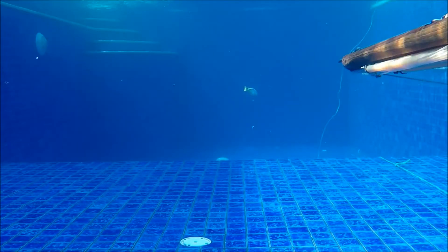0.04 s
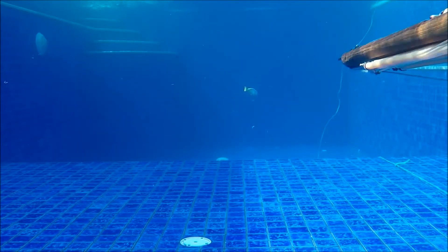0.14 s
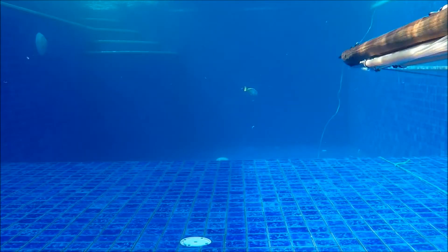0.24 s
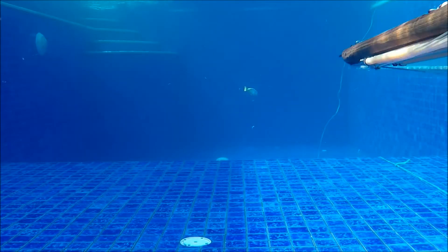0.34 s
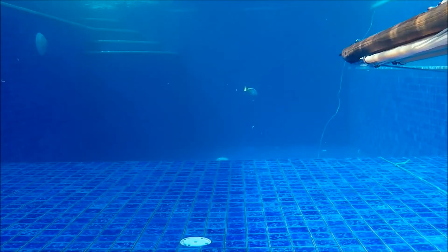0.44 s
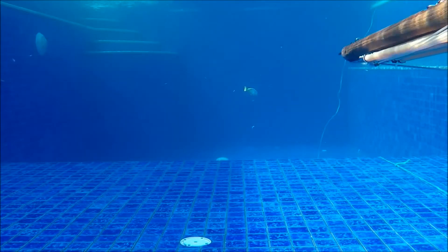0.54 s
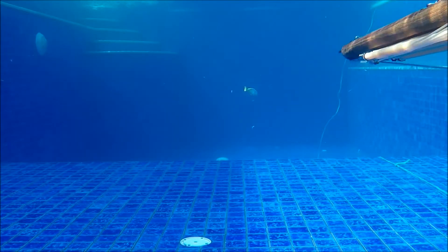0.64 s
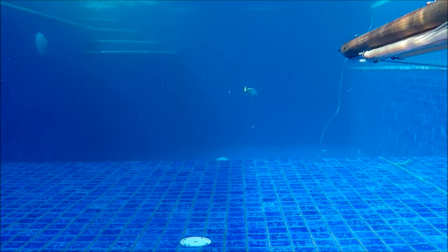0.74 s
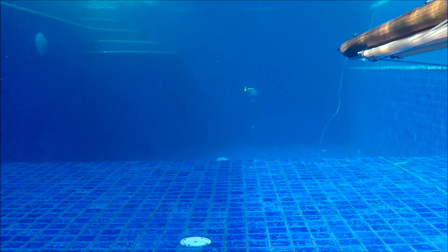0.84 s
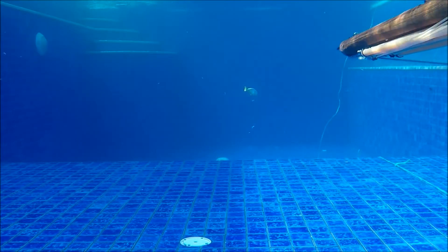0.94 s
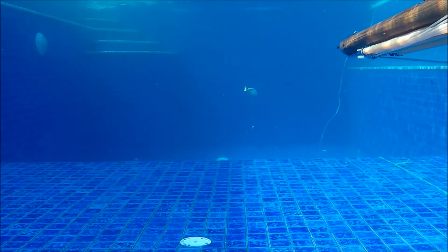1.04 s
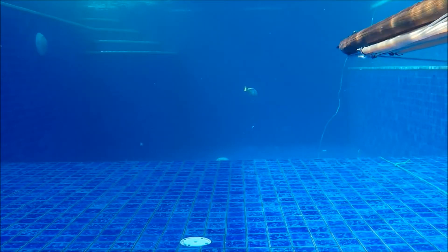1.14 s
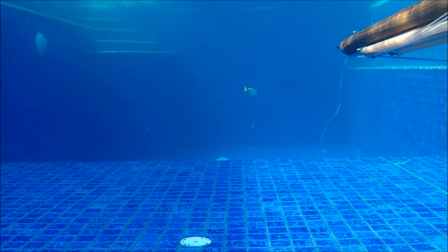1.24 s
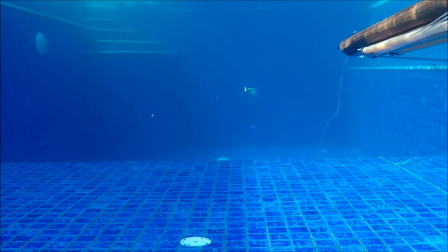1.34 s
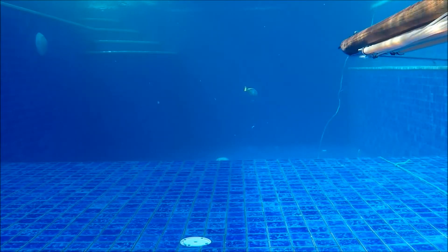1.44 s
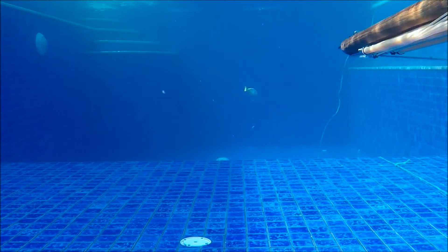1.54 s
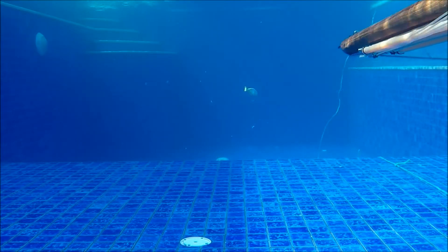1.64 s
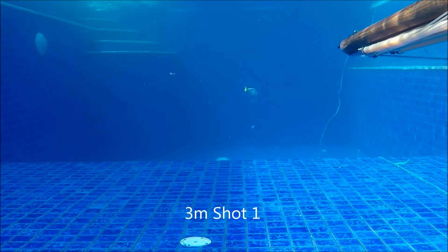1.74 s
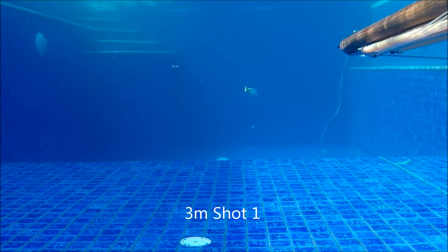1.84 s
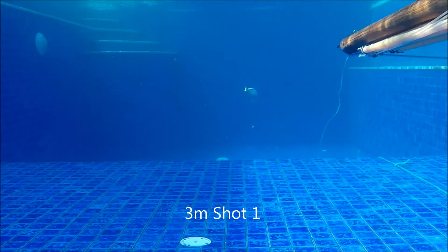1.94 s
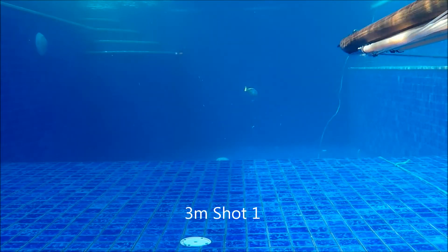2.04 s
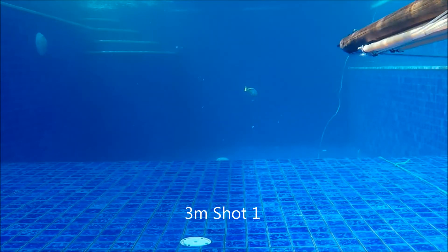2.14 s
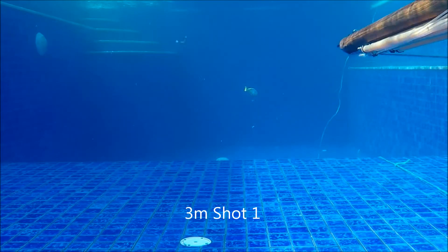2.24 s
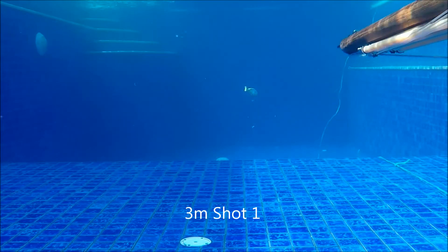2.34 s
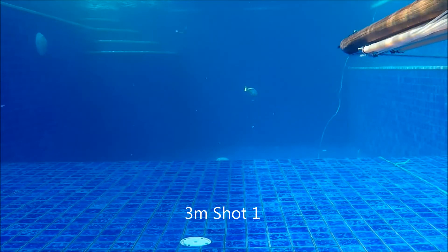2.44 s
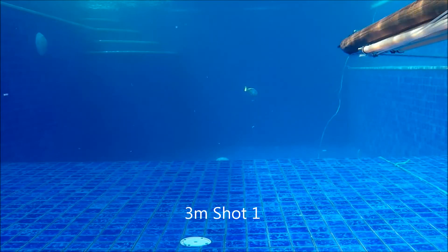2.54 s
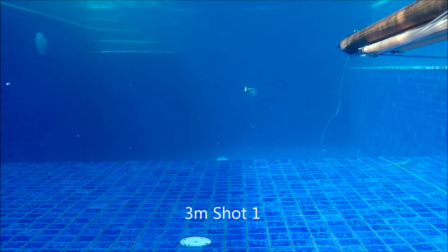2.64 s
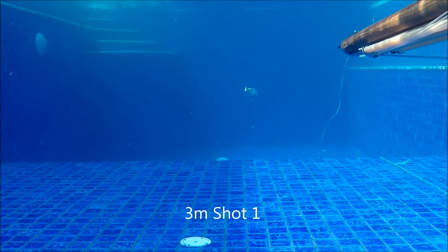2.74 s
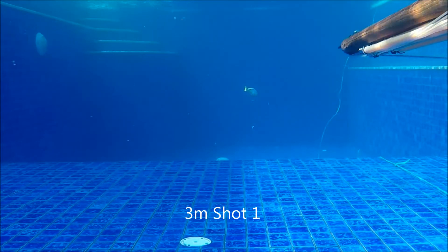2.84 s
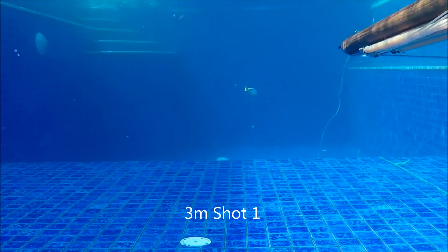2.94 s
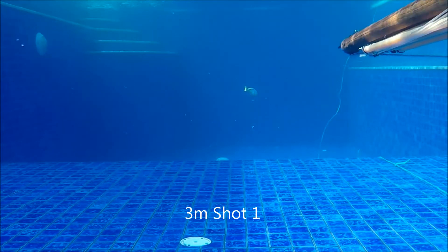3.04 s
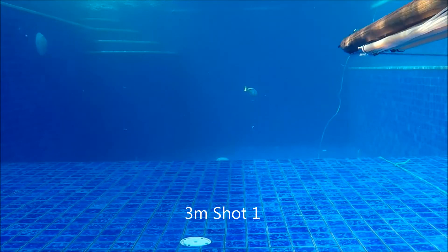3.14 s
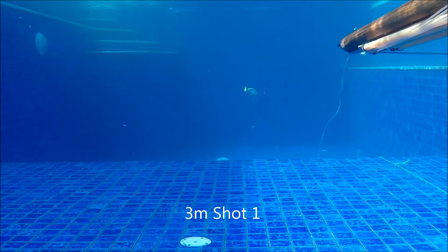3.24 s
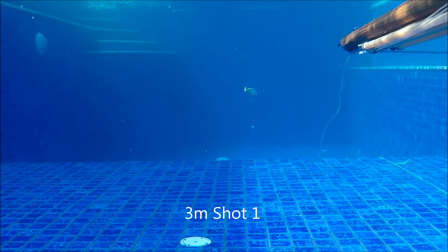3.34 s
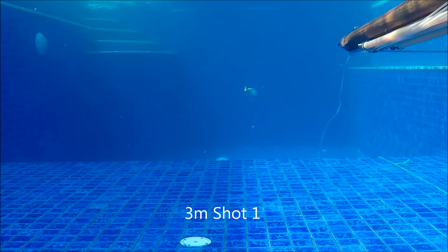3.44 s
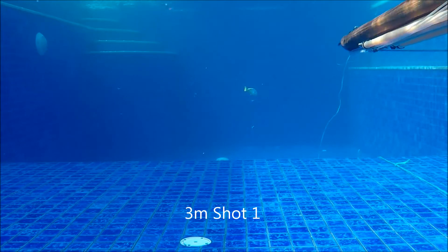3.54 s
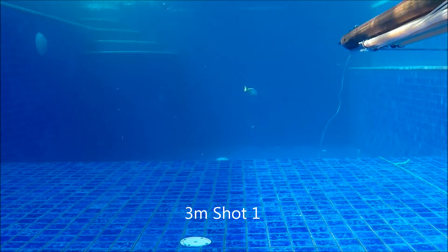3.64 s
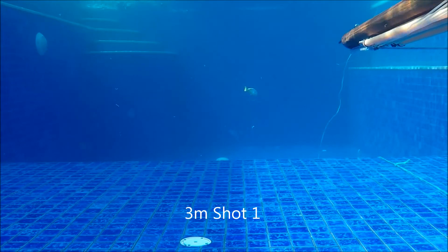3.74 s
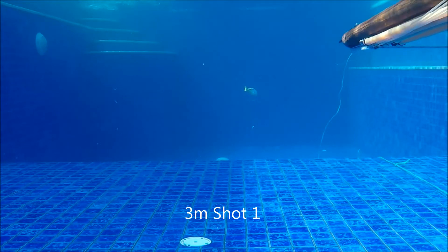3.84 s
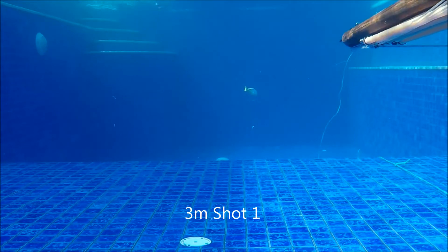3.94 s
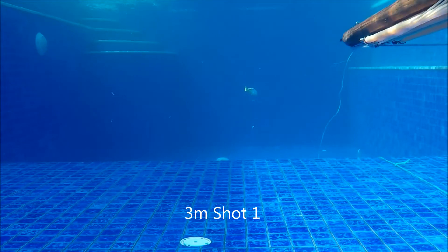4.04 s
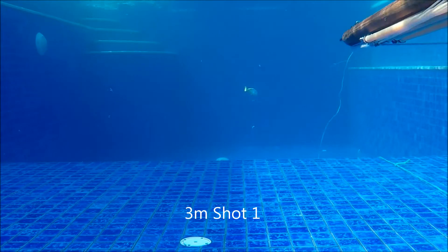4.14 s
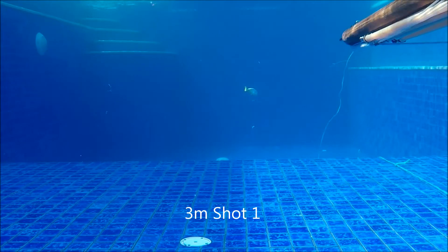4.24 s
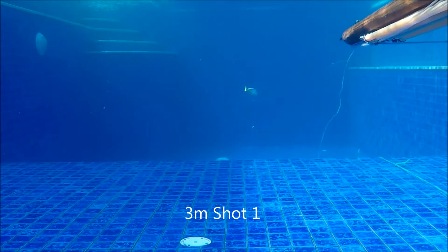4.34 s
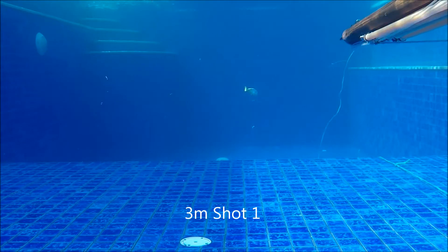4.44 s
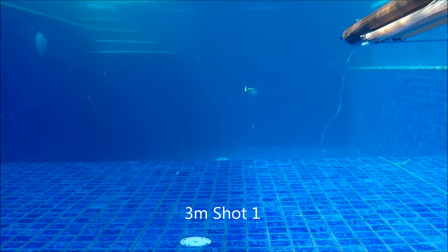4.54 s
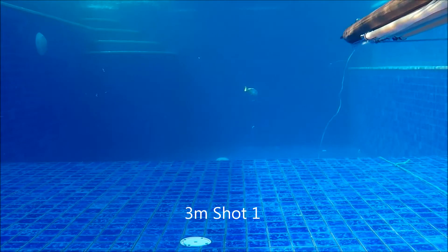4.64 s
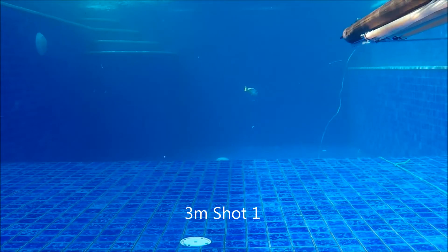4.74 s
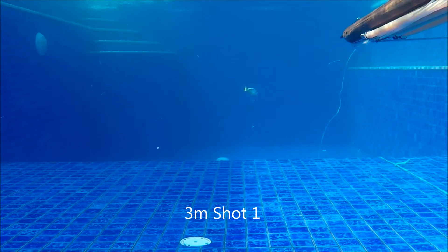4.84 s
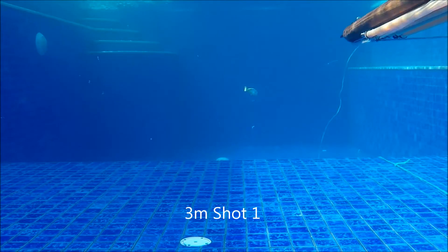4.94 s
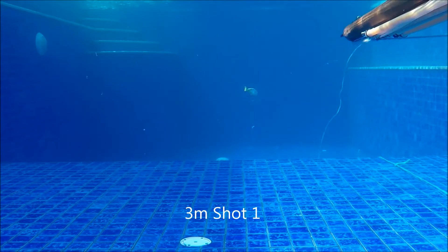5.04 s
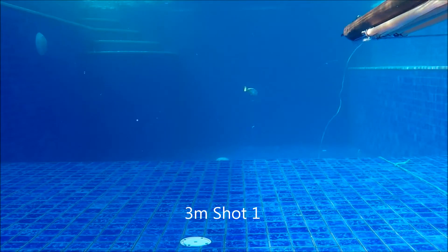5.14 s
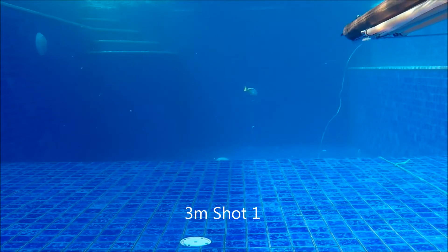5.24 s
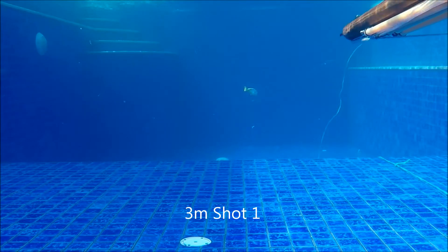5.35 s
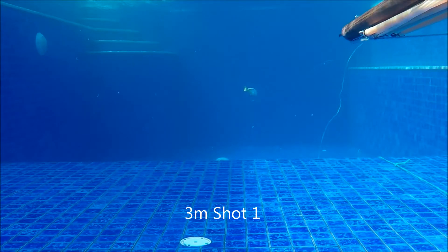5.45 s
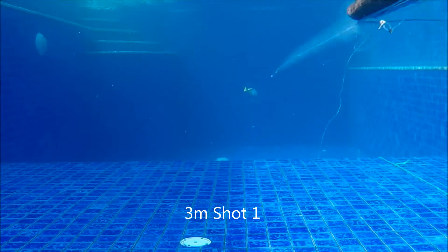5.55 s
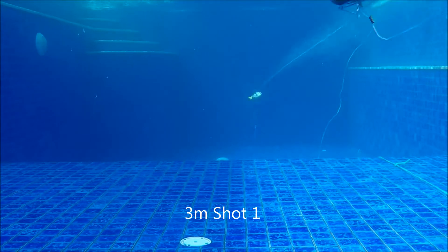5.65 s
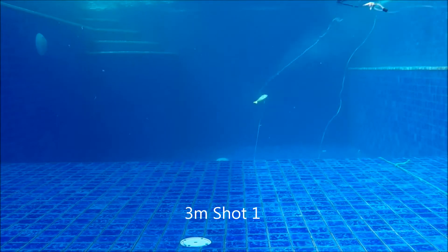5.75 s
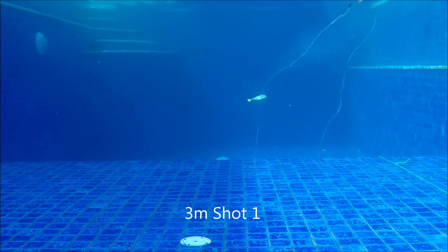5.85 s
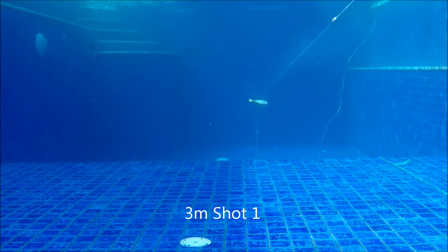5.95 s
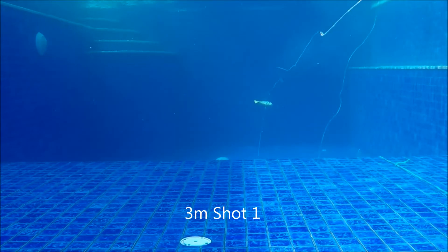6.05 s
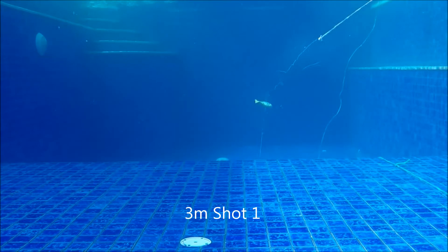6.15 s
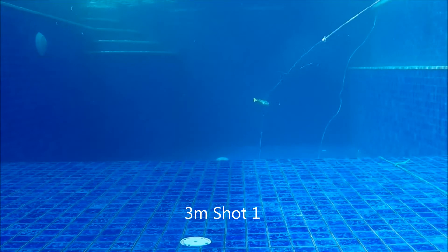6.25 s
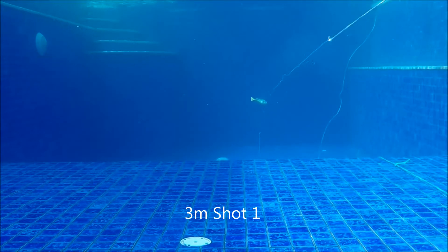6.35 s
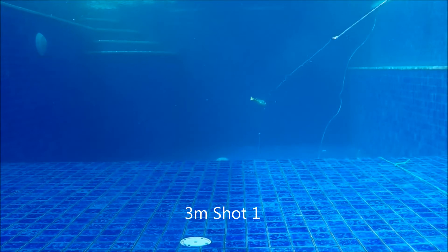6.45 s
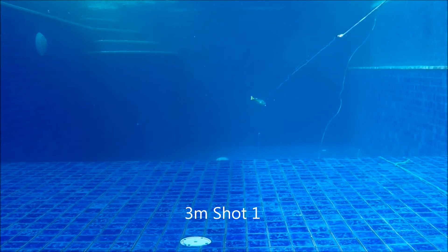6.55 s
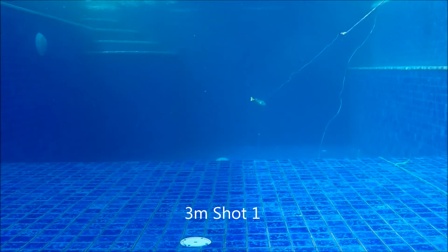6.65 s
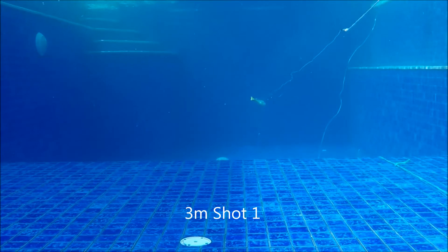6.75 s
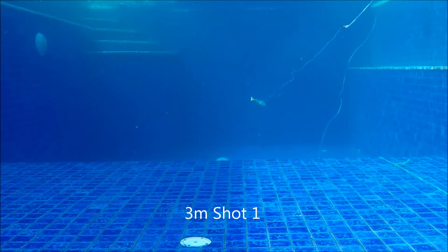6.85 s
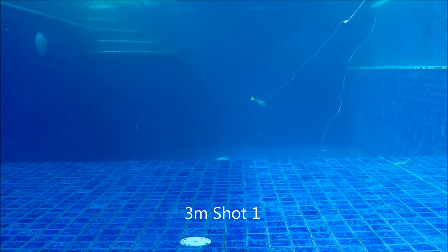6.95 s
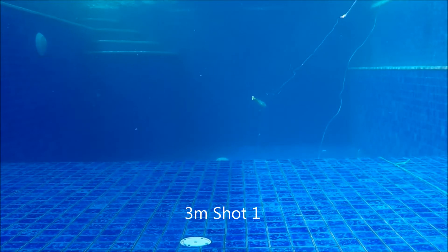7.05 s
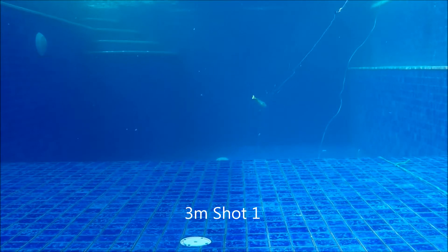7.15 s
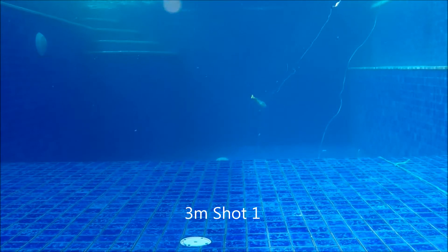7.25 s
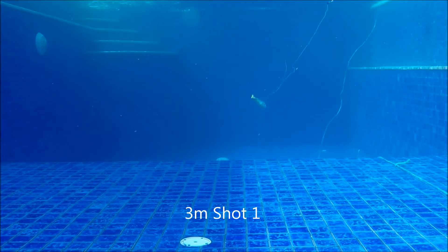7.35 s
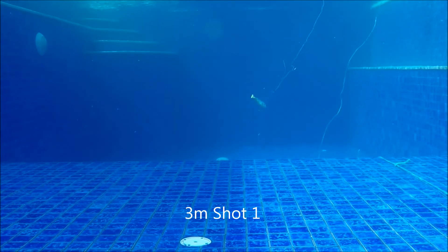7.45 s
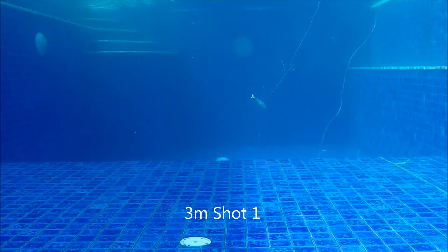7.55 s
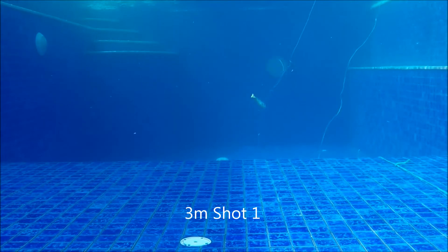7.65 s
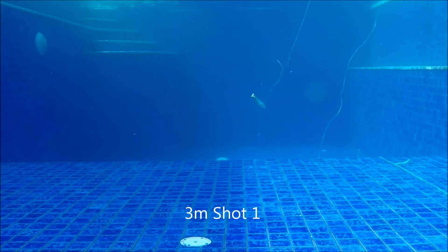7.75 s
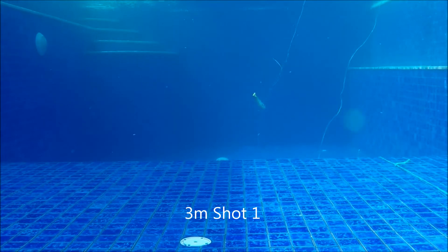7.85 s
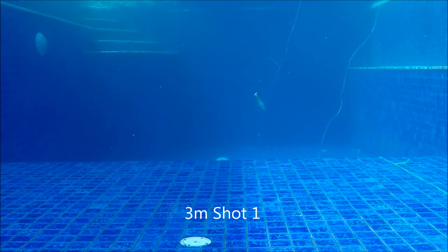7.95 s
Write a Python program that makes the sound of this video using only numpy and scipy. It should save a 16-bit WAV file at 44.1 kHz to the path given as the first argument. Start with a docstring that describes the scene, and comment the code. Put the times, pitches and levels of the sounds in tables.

```python
"""Under water in a tiled pool, a filter pump drones and bubbles crackle round a camera in its waterproof case.
At 5.5 s a speargun close by thumps the case; its spear hits a target, sinks and skitters on the tiles.
Swelling sines make the thumps, shaped noise the cracks, rasp, wash and blows, tiny impacts the tile chatter,
decaying sines the spear and bubbles, wavering sines with noise the pump.
The camera's gain control ducks at loud peaks, hardest at the shot, and creeps back up."""
import sys
import numpy as np
from scipy import signal
from scipy.fft import rfft, irfft, next_fast_len
from scipy.io import wavfile
from scipy.ndimage import uniform_filter1d, map_coordinates

SR = 44100
rng = np.random.default_rng(int(sys.argv[2]) if len(sys.argv) > 2 else 0)


def put_to_file(sound):
    """Save the sound as 16-bit audio at rate SR, in the file named by the first command-line argument."""
    columns = np.atleast_2d(sound).T  # one column per channel
    safe = np.clip(columns, -1, 1)
    whole_steps = np.round(safe * 32767)
    wavfile.write(sys.argv[1], SR, whole_steps.astype(np.int16))


N = 353232

# relative spectrum of the rough rasp in thumps and slide: columns [freq_hz, level_db]
GRIT_SPECTRUM = [(60, -14), (160, 8), (260, -5.5), (750, 5.5), (1150, -8.5), (1450, -0.5), (2400, -15.5),
                 (3200, -11), (3900, -26.5), (5300, -21), (6700, -30.5), (8000, -28), (10500, -40),
                 (15000, -74)]


def gun(slide_db=8.0, wash_db=-3.0, flutter_db=3.5, wet_db=-34, slide_wet_db=-14, bump_wet_db=-18):
    """The action and the line thump the case; steel snaps add the crack, then slide and wash follow."""
    # trigger, recoil and rubber bands slapping home, before port balance: columns [start_s, level_db, pitch_hz]
    action_hits = [(5.4755, -12, 567), (5.474, -4.5, 121), (5.485, -9.5, 543), (5.4915, 24.5, 456),
                   (5.4955, 22, 680), (5.516, 32, 508), (5.5235, 26, 309), (5.5275, 18, 601),
                   (5.5378, 34.5, 490)]
    # light bumps of gun and line, before the wall's colour: columns [start_s, level_db, pitch_hz]
    case_bumps = [(3.9838, -17, 616), (5.6275, 12.5, 570), (5.7015, 5.5, 590), (5.7055, 6, 510),
                  (5.7285, 5.5, 564), (5.7335, 5.5, 558), (5.7995, -9, 574), (6.13, -11.5, 530),
                  (6.288, -20.5, 451), (6.404, -22.5, 419), (6.459, -18, 510), (6.718, -27.5, 395),
                  (6.889, -30, 186), (7.333, -25, 518), (7.413, -21.5, 640), (7.584, -34, 228),
                  (7.764, -32.5, 288), (7.9, -35, 259)]
    # the case wall rings briefly near 690 Hz when bumped, with a deep dip from 750 to 1100 Hz: columns
    # [freq_hz, gain_db]
    wall_gain = [(250, 1), (450, -1), (620, -1), (685, 4.5), (750, -7), (840, -23.5), (1100, -19.5),
                 (1500, -5)]
    # the one hard crack that lets the spear go: columns [start_s, level_db]
    crack_hit = [(5.4972, 28.5)]
    # relative spectrum of that crack: columns [freq_hz, level_db]
    crack_spectrum = [(300, -16), (900, -3), (1450, 10), (2100, -1), (2700, -2), (3200, 5), (4300, -8),
                      (5000, -3), (5600, -4), (6500, -17), (8000, -15), (11000, -28), (15000, -39)]
    # steel snaps, from trigger catch to line clip rattling on the barrel: columns [start_s, level_db]
    steel_snaps = [(5.4635, -37), (5.468, -34), (5.4735, -32), (5.478, -37), (5.486, -29), (5.4945, 12.5),
                   (5.529, 0), (5.5395, 11), (5.569, -6), (5.573, -3), (5.583, -7), (5.659, -18),
                   (5.69, -20), (5.7035, -20), (5.709, -21), (5.716, -22), (5.735, -32), (5.742, -29),
                   (5.783, -32)]
    # relative spectrum of the snaps: columns [freq_hz, level_db]
    snap_spectrum = [(300, -22), (900, -5.5), (1450, 9.5), (2200, -4.5), (3150, 1), (4100, -12), (5200, -4),
                     (6500, -15.5), (8000, -13.5), (11000, -31), (15000, -43)]
    # relative spectrum of the churning water: columns [freq_hz, level_db]
    wash_spectrum = [(15, -17), (50, -11), (150, -2.5), (220, -7), (450, -12), (750, -35), (1080, -53),
                     (1480, -39.5), (2200, -40), (3200, -33), (4200, -44.5), (5500, -35), (8000, -40),
                     (15000, -87)]

    action = thumps(action_hits, swell_cycles=2.5, grit_db=-20, push_hz=163, push_db=-12.5, push_s=.008)
    bumps = thumps(case_bumps, swell_cycles=2.12, grit_db=-26, push_hz=298, push_db=-12, push_s=0.0035)
    bumps = coloured(bumps, lambda hz: along(wall_gain, hz))
    crack = contacts(crack_hit, t60=.0062, attack=.0003) * rush(crack_spectrum)
    snaps = contacts(steel_snaps, t60=0.018, attack=0.00044) * rush(snap_spectrum)
    shot = action + bumps + crack + snaps

    # the rasp along the barrel grows louder until the spear is clear of the muzzle
    sliding = np.interp(np.arange(N) / SR, [5.497, 5.5, 5.542, 5.545], [0, .6, 1.6, 0])
    slide = amp(slide_db) * sliding * rush(GRIT_SPECTRUM)

    # water churns unevenly behind the recoiling gun
    churn = contacts([(5.5, wash_db)], t60=0.5, attack=.005)
    wash = churn * amp(flutter_db * wobble(130)) * rush(wash_spectrum)

    to_pool = amp(wet_db) * shot + amp(slide_wet_db) * slide + amp(bump_wet_db) * bumps
    return shot + slide + wash + pool(to_pool)


def thumps(table, swell_cycles, grit_db, push_hz, push_db, push_s):
    """Each thump swells and dies within a few cycles, with some grit, on a push of water at a fixed pitch."""
    t = np.arange(SR // 8) / SR
    tone, grit = np.zeros(N), np.zeros(N)

    def swell(peak_s):
        """Rise to 1 at peak_s and fall again."""
        return (t / peak_s * np.exp(1 - t / peak_s)) ** 6

    for s, db, hz in table:
        shape = amp(db) * swell(swell_cycles / hz)
        push = amp(db + push_db) * swell(push_s) * np.sin(2 * np.pi * push_hz * t)
        add(tone, s, shape * np.sin(2 * np.pi * hz * t) + push)
        add(grit, s, shape)
    return tone + amp(grit_db) * grit * rush(GRIT_SPECTRUM)


def target(level_db=4, wet_db=-4):
    """Dull, distant blows of the spear on the target, with much of the pool in them."""
    # the spear strikes and then jostles, before level_db: columns [start_s, level_db]
    strikes = [(5.947, -19), (5.962, -7), (5.972, -15.5), (6.128, -29.5), (6.205, -31), (6.332, -33),
               (6.405, -32.5), (6.462, -28)]
    # relative spectrum of the blows: columns [freq_hz, level_db]
    board_spectrum = [(100, -12), (300, 3.5), (600, 19), (800, -22), (1100, -18), (1550, 5), (2300, -15),
                      (3200, -9), (4500, -18), (7000, -15), (9000, -29), (14000, -51)]
    blows = amp(level_db) * contacts(strikes, t60=0.057, attack=0.00072) * rush(board_spectrum)
    return blows + amp(wet_db) * pool(blows)


def skitter(level_db=1.24, wet_db=-10, slap_t60=0.076, slap_attack=0.0022, impacts_per_s=2700,
            right_db=1, ring_loss_db_per_s=18):
    """The spear chatters on the tiles and rings along its length, unevenly as it whips about."""
    # the steel spear slaps the tiles, a few times with each bounce: columns [start_s, relative level_db]
    slaps = [(6.9614, -23), (6.975, -23.5), (6.986, -21.5), (6.995, -27), (7.081, -27.5), (7.09, -31),
             (7.105, -24.5), (7.114, -30), (7.153, -18), (7.163, -12.5), (7.175, -12.5), (7.186, -28),
             (7.253, -31), (7.281, -22), (7.292, -23), (7.301, -19.5), (7.313, -24), (7.325, -20.5),
             (7.356, -37), (7.385, -22), (7.396, -23), (7.406, -22.5), (7.423, -24.5), (7.44, -32.5),
             (7.465, -39), (7.488, -34.5), (7.498, -32), (7.509, -25.5), (7.527, -33), (7.567, -39),
             (7.596, -31), (7.61, -33.5), (7.623, -37), (7.694, -42.5)]
    # lengthwise modes of the spear: columns [freq_hz, level_db at the hardest slap before settling,
    # t60_s, loss (dB lost per dB that a slap is softer)]
    shaft_modes = [(2083, -28.5, 0.36, 4.5), (4172, -39, 0.62, 1.2), (6255, -38.5, 0.48, 0.55),
                   (8333, -36, 0.55, .75)]
    # relative spectrum of the chatter under its resonances: columns [freq_hz, level_db]
    tile_spectrum = [(150, -10), (400, -12.5), (600, 6), (750, -7.5), (950, -18.5), (1700, -8), (2400, -10),
                     (3200, -10), (3900, -13.5), (4600, -9), (5200, -3), (6300, -1.5), (7000, -2.5),
                     (8100, -4), (9000, -9.5), (11000, -20.5), (15000, -31)]
    # resonances of the spear, tiles and case that ring under the slaps: columns [freq_hz, width_hz, boost_db]
    chatter_resonances = [(1750, 44, 8), (3210, 80, 11), (5030, 60, 11), (5120, 50, 9), (5260, 80, 5),
                          (5730, 55, 8), (6050, 81, 8), (6413, 45, 8), (7550, 55, 6), (7870, 114, 14.5),
                          (8035, 70, 9), (8835, 45, 7), (9360, 90, 10.5), (10400, 60, 10)]

    t, ring = np.arange(N) / SR, np.zeros(N)
    when, strength = np.transpose(slaps)
    for hz, level, t60, loss in shaft_modes:
        softer = strength.max() - strength
        # the shaft rings less as it settles
        drive = level - loss * softer - ring_loss_db_per_s * (when - when[0])
        drive = drive + rng.normal(0, 2, len(when))
        flutter = amp(2.5 * wobble(30))
        ring += flutter * contacts(zip(when, drive), t60, attack=0.01) * np.sin(2 * np.pi * hz * t)

    # each slap is a burst of tiny impacts of uneven size that ring spear, tile and case
    impacts = rng.standard_normal((2, N)) * (rng.random((2, N)) < impacts_per_s / SR)
    rung = coloured(impacts, lambda hz: along(tile_spectrum, hz) + peaked(chatter_resonances, hz))
    chatter = unit(ports(rung))
    scrape = amp(level_db) * contacts(slaps, slap_t60, slap_attack) * chatter
    # left down and right up by right_db each
    return (scrape + amp(wet_db) * pool(scrape) + ring) * amp([[-right_db], [right_db]])


def fizz(hiss_db=-54.0, crackle_db=-1, wet_db=-3):
    """Single bubbles pop as decaying sines over the noise hiss of countless finer ones."""
    # bubble families: columns [rate_per_s, centre_hz, pitch_spread (log units), life_cycles,
    # level_db before crackle_db and the spread of loudness]
    families = [(46, 1600, .14, 5.5, -48), (56, 2200, .14, 6, -48), (20, 3170, .045, 9, -48.5),
                (30, 5400, .1, 6, -49), (5, 8000, .15, 4, -51), (8, 640, .15, 4, -44)]
    # the nearest bubbles: columns [start_s, level_db, pitch_hz, life_cycles]
    near_pops = [(.004, -30, 2330, 9), (.0528, -34, 1412, 13), (.056, -25, 1910, 1.9),
                 (.1505, -34, 2250, 9.9), (.3262, -33, 1755, 8.9), (.551, -17.5, 1600, 1.1),
                 (.5935, -34, 2420, 9.5), (0.634, -33.5, 3120, 10.7), (1.394, -23, 4820, 2.1),
                 (1.448, -32.5, 3090, 11), (1.886, -33, 3110, 9.1), (2.093, -24, 3360, 4),
                 (2.158, -34.5, 1540, 7.6), (2.222, -32.5, 1780, 4.9), (2.62, -35.5, 1360, 8.7),
                 (2.975, -36, 1780, 10), (3.57, -33.5, 2235, 12.4), (3.957, -34, 3180, 13),
                 (4.024, -35, 2120, 8), (4.651, -31.5, 3300, 8.6), (4.79, -36, 2200, 9),
                 (4.8369, -31.5, 2200, 11), (4.867, -35, 1660, 12)]
    # relative spectrum of the hiss: columns [freq_hz, level_db]
    hiss_spectrum = [(500, -25), (900, 2.5), (1400, 3.5), (2300, -3.5), (2700, -10.5), (3150, -2),
                     (3600, -10.5), (4400, -11), (5400, -7.5), (8000, -9), (10000, -11.5), (12400, -18.5),
                     (15000, -31.5)]

    out = np.zeros((2, N))
    for rate, centre, spread, cycles, db in families:
        for when, rank, pitch in rng.random((int(rate * N / SR), 3)):
            hz = centre * np.exp(spread * np.sqrt(3) * (2 * pitch - 1))
            loudness = amp(db - 3 * np.log(rank + .02))  # a few stand well above the rest
            add(out, when * N / SR, amp(crackle_db) * loudness * bubble(hz, cycles))
    for s, db, hz, cycles in near_pops:
        add(out, s, amp(db) * bubble(hz, cycles))
    hiss = amp(hiss_db + 0.77 * wobble(12)) * rush(hiss_spectrum)
    return out + amp(wet_db) * pool(out) + hiss


def bubble(hz, cycles):
    """A bubble rings for a few cycles and reaches each port at its own phase."""
    turns = hz * np.arange(SR // 20) / SR
    envelope = np.exp(-turns / cycles) * (1 - np.exp(-turns / 2))
    return envelope * np.sin(2 * np.pi * (turns + rng.random((2, 1))))


def pump(flow_db=-41, drift=0.85, waver_db=2):
    """Rumbling flow noise, with motor lines that waver in level and phase as the surface moves."""
    # pump motor and mains lines, before their waver: columns [freq_hz, level_db (sine peak)]
    motor_lines = [(80, -52.5), (100.3, -42), (344, -52.5), (360, -49.5), (392.5, -46.5), (441.4, -48.5),
                   (476, -51.5), (491, -47.5), (582, -48)]
    # relative spectrum of the flow: columns [freq_hz, level_db]
    flow_spectrum = [(15, -8.5), (40, 0), (100, -4), (165, -4), (270, -11.5), (340, 0), (490, -2.5),
                     (525, -1.5), (590, 3), (630, -5), (690, -12), (790, -18), (1000, -26), (2000, -70)]

    t, lines = np.arange(N) / SR, np.zeros(N)
    for hz, db in motor_lines:
        level = amp(db + waver_db * wobble(4))
        lines += level * np.sin(2 * np.pi * hz * t + drift * wobble(2.5))  # drift in radians
    lumps = amp(1.1 * wobble(35))  # the whole drone flickers slightly
    flow = amp(flow_db + 0.88 * wobble(12)) * rush(flow_spectrum)
    return lumps * (lines + flow)


def pool(x):
    """Sound lingers between tiled walls and surface: noise whose decay time depends on frequency."""
    # reverberation of the pool: columns [freq_hz, t60_s]
    decay = [(100, 0.98), (500, 0.38), (1500, 0.26), (4000, 0.15), (8000, 0.16), (14000, 0.23)]
    hz, t, z = signal.stft(rng.standard_normal((2, SR // 2)), SR, nperseg=256)
    fade = amp(-60 * t / along(decay, hz)[:, None])
    tail = signal.istft(z * fade, SR, nperseg=256)[1]
    tail = ports(tail)[:, :SR // 2]
    return signal.fftconvolve(x, tail / np.linalg.norm(tail[0]), axes=1)[:, :N]


def ports(pair):
    """Blend two unrelated signals into the case's left and right ports, as alike as the case makes them."""
    # likeness of the ports, held within -1 (opposite) to 1 (same): columns [freq_hz, correlation]
    likeness = [(60, 4), (140, -0.35), (300, 1.5), (630, -0.23), (1380, -0.83), (2200, 0.33), (3050, 0.97),
                (6000, 0), (14000, 0)]

    def turn(hz):
        """Blend angle in radians that gives the correlation."""
        return np.arccos(np.clip(along(likeness, hz), -1, 1)) / 2

    mid, side = filtered(pair, lambda hz: np.array([np.cos(turn(hz)), np.sin(turn(hz))]))
    return np.array([mid + side, mid - side])


def rush(spectrum):
    """Stereo noise of rms 1 with a given colour."""
    noise = filtered(rng.standard_normal((2, N)), lambda hz: amp(along(spectrum, hz)))
    return unit(ports(noise))


def contacts(table, t60, attack):
    """Envelope of a series of hits, t60 and attack in seconds; their powers add."""
    t, power = np.arange(SR // 2) / SR, np.zeros(N)
    for s, db in table:
        envelope = amp(db - 60 * t / t60) * (1 - np.exp(-t / attack))
        add(power, s, envelope ** 2)
    return np.sqrt(power)


def coloured(x, gain_db):
    """Causal (minimum-phase) filter with a gain in dB that is a function of frequency."""
    m = next_fast_len(N + SR // 2, real=True)
    cepstrum = irfft(np.log(amp(gain_db(np.fft.rfftfreq(m, 1 / SR)))), m)
    # folding the cepstrum forward in time keeps any ringing after the hit
    cepstrum[..., 1:m // 2] *= 2
    cepstrum[..., m // 2 + 1:] = 0
    return irfft(rfft(x, m) * np.exp(rfft(cepstrum)), m)[..., :N]


def peaked(resonances, hz):
    """Summed boost in dB from rows of centre (Hz), width (Hz) and boost (dB)."""
    return sum(db / (1 + (2 * (hz - centre) / width) ** 2) for centre, width, db in resonances)


def filtered(x, response):
    """Multiply the spectrum of x by a response that is a function of frequency."""
    m = next_fast_len(N + SR // 2)
    return irfft(rfft(x, m) * response(np.fft.rfftfreq(m, 1 / SR)), m)[..., :N]


def add(track, s, sound):
    """Mix a sound into a track at time s, in seconds."""
    part = track[..., max(round(s * SR), 0):][..., :sound.shape[-1]]
    part += sound[..., :part.shape[-1]]


def wobble(rate):
    """A smooth random curve, rate knots a second."""
    knots = rng.standard_normal(int(N * rate / SR) + 4)
    return map_coordinates(knots, [np.arange(N) * rate / SR])


def along(points, hz):
    """Read a value at hz from (Hz, value) points on a log axis."""
    f, v = np.transpose(points)
    return np.interp(np.log(hz + 1), np.log(f + 1), v)


def amp(db):
    """Decibels to gain."""
    return 10 ** (np.asarray(db) / 20)


def unit(x):
    """Scale to rms 1."""
    return x / np.sqrt(np.mean(x ** 2) + 1e-20)


def scene():
    """All the water's sound passes through the case, whose two ports differ in level with frequency."""
    # port balance: columns [freq_hz, left_minus_right_db]
    balance = [(110, 1.5), (200, -1), (370, -7), (690, -6.5), (1270, -0.5), (2330, 2), (4300, -2.5),
               (7900, -4), (14600, 0)]
    water = pump() + fizz() + gun() + target() + skitter()
    return coloured(water, lambda hz: np.array([along(balance, hz), -along(balance, hz)]) / 2)


def ducking(x, ceiling_db=0, recovery=4.44, ease=1.393):
    """Gain reduction in dB: it sees peaks a millisecond ahead and lets go briskly at first, then more slowly."""
    peaks = np.abs(uniform_filter1d(x, size=8)).max(axis=0)
    peaks = np.roll(peaks, -SR // 1000)
    over = np.maximum(20 * np.log10(peaks + 1e-9) - ceiling_db, 0) ** (1 / ease)
    # holding the maximum against a slope makes a steady release in the eased scale
    slope = recovery * np.arange(N) / SR
    held = np.maximum.accumulate(over + slope) - slope
    return uniform_filter1d(np.abs(held) ** ease, size=24)


def record(dry, low_cut_hz=138, leak_db=-35, open_db=-9, open_s=0.009, top_hz=15150):
    """Gain control, a low cut that fades out as loud peaks add up, soft clipping and the band limit."""
    x = dry * amp(-ducking(dry))
    bass = (1 - amp(leak_db)) * filtered(x, lambda hz: 1 / (1 + (hz / low_cut_hz) ** 20))
    # the cut is gone once the level has spent open_s in all above open_db
    loud = np.abs(dry).max(axis=0) > amp(open_db)
    opened = np.minimum(np.cumsum(loud) / SR / open_s, 1) ** 2
    x = x - (1 - opened) * bass
    x = x / (1 + np.abs(x) ** 8) ** (1 / 8)
    return filtered(x, lambda hz: 1 / (1 + (hz / top_hz) ** 120))


dry = scene()
out = record(dry)
put_to_file(out)
```